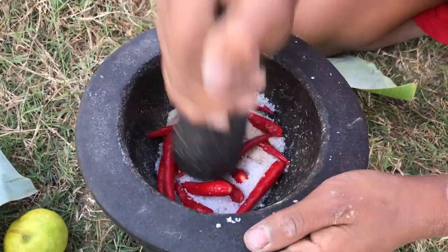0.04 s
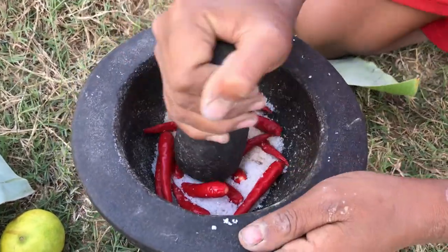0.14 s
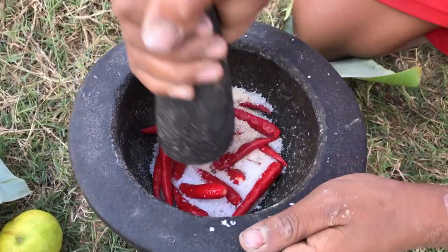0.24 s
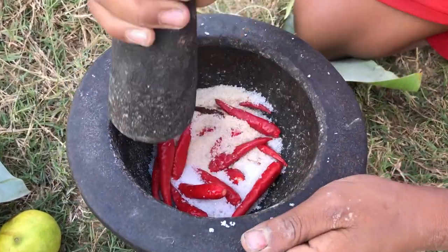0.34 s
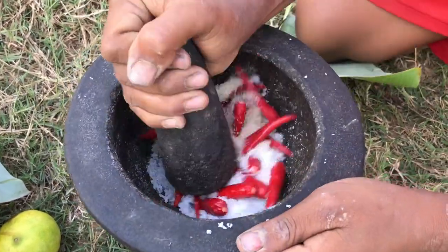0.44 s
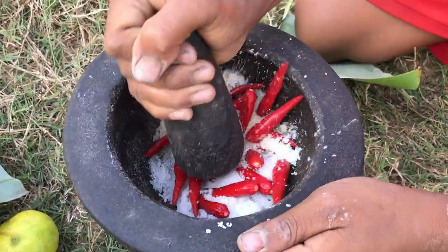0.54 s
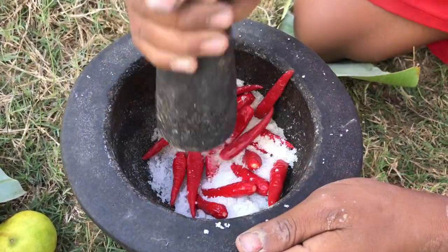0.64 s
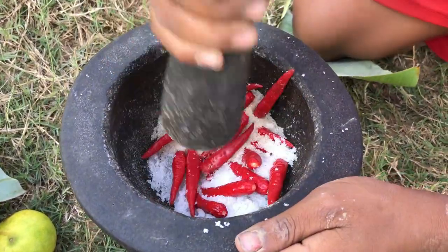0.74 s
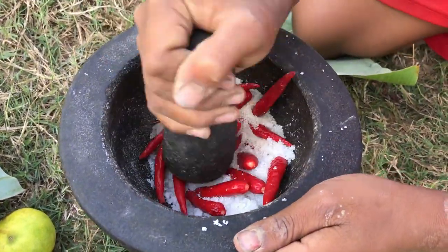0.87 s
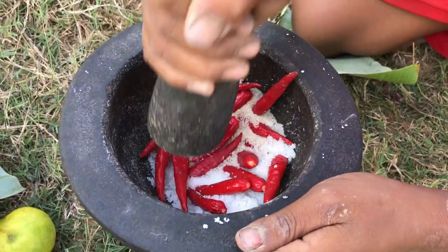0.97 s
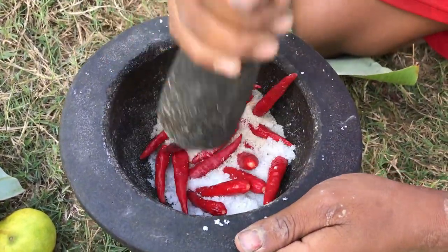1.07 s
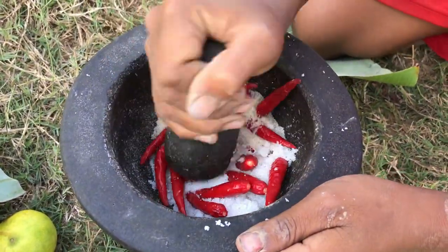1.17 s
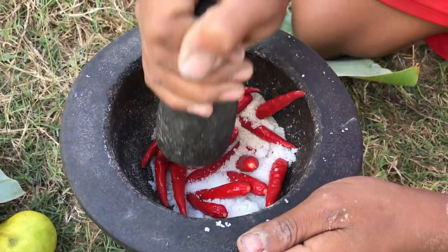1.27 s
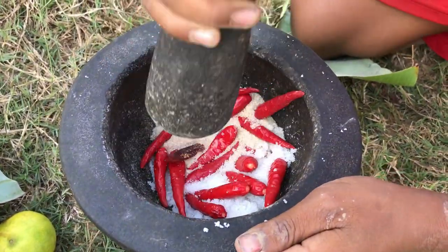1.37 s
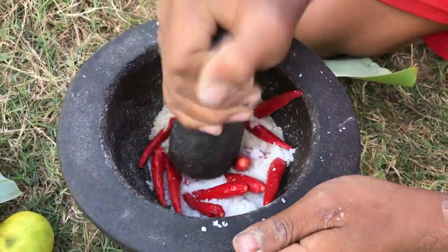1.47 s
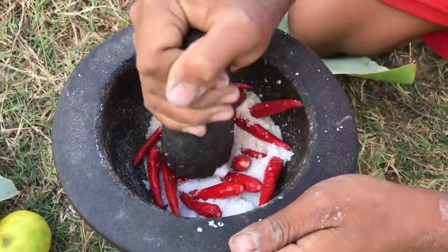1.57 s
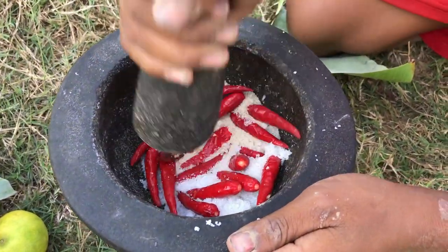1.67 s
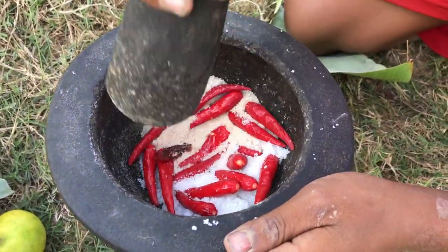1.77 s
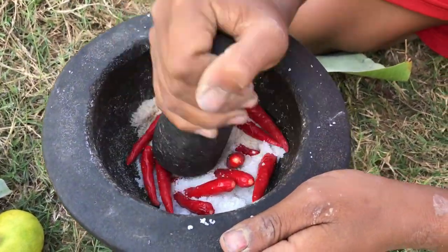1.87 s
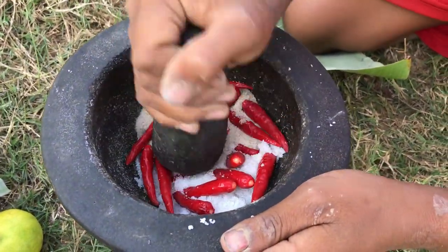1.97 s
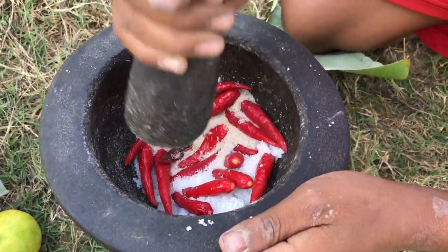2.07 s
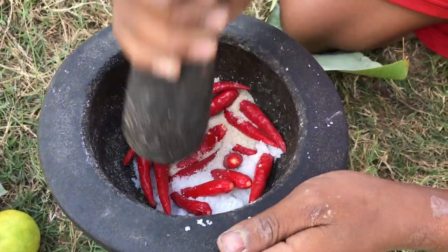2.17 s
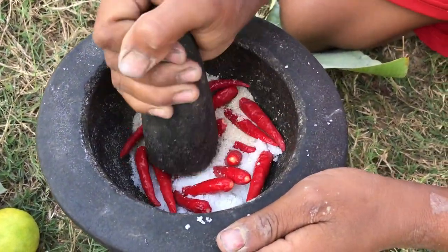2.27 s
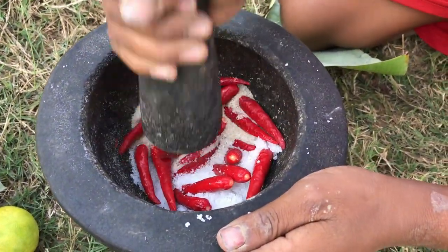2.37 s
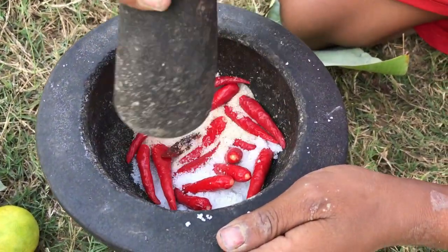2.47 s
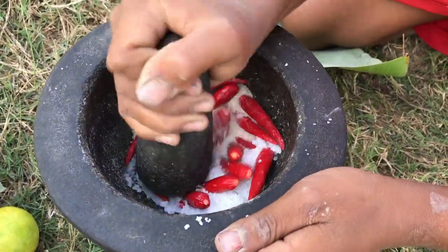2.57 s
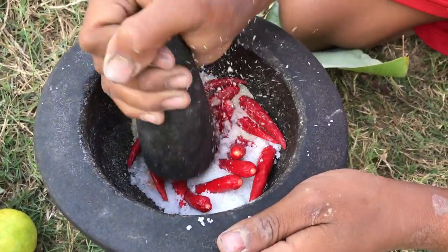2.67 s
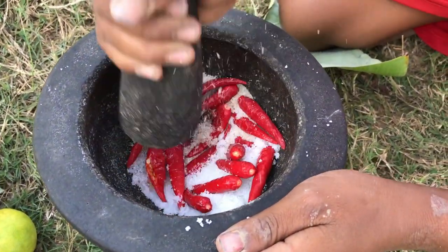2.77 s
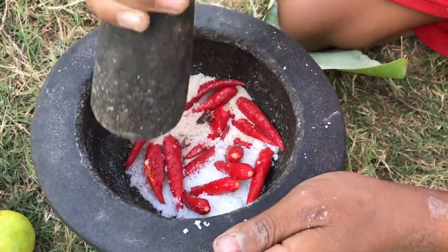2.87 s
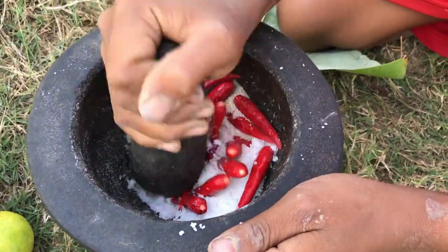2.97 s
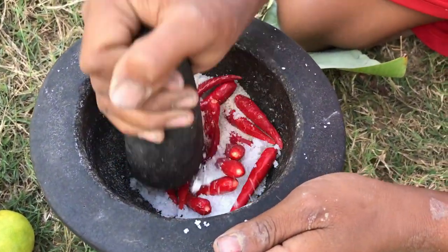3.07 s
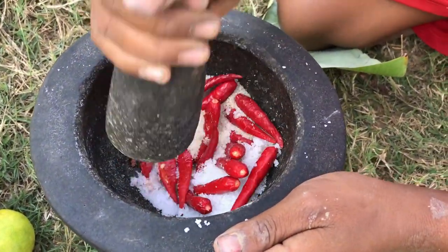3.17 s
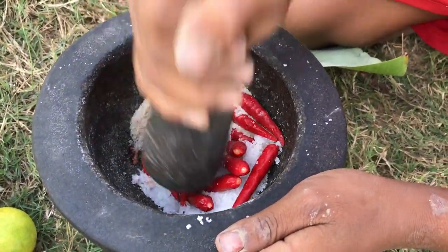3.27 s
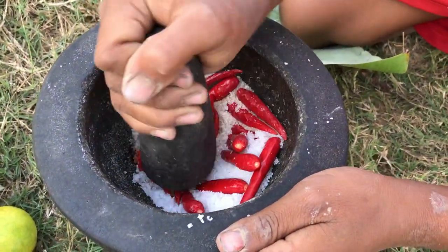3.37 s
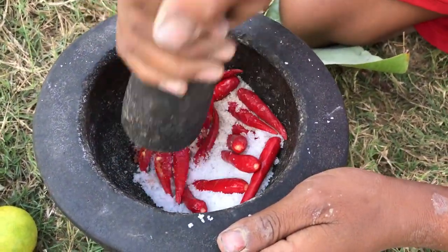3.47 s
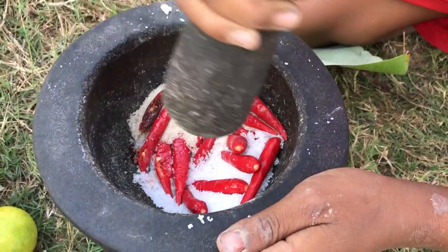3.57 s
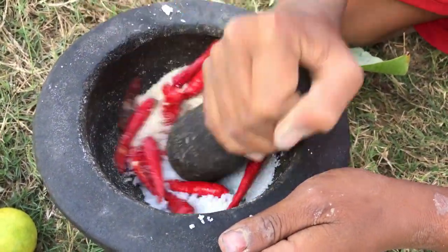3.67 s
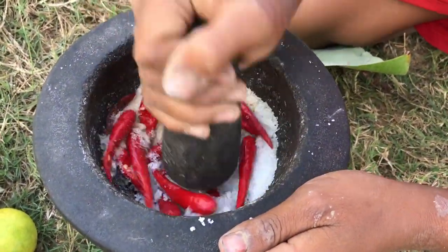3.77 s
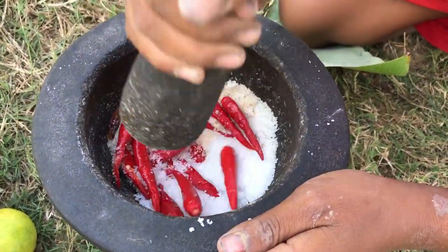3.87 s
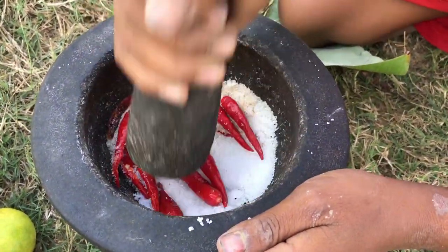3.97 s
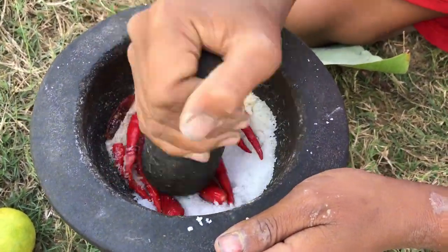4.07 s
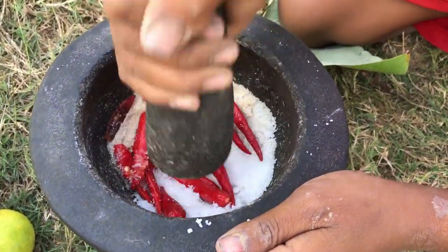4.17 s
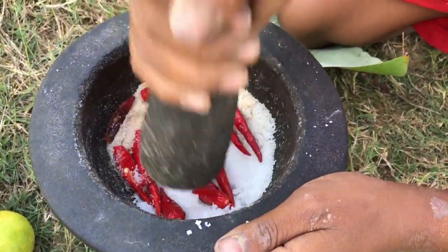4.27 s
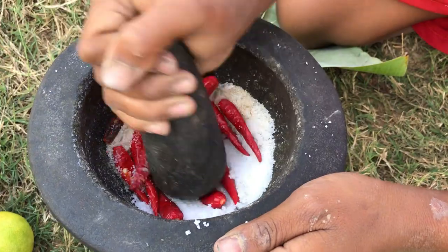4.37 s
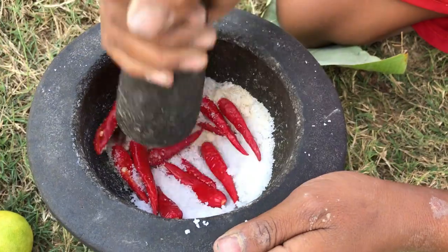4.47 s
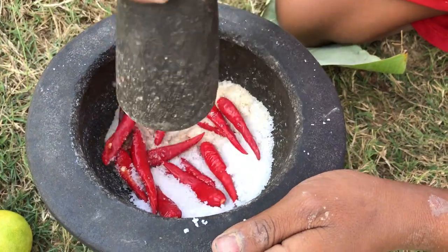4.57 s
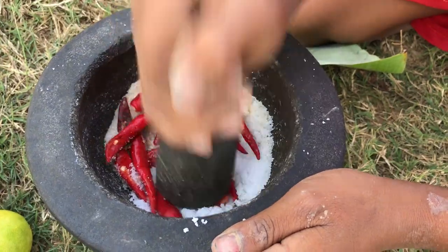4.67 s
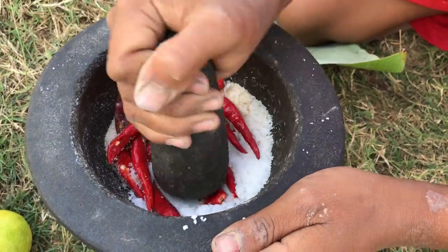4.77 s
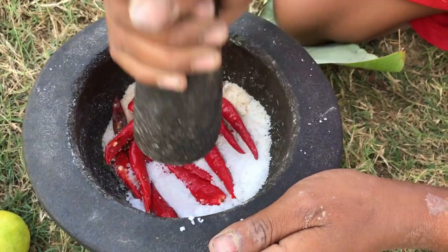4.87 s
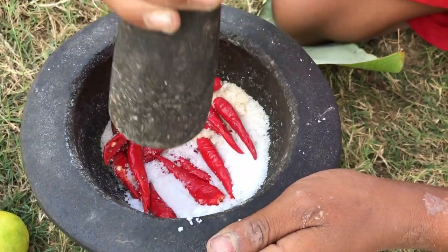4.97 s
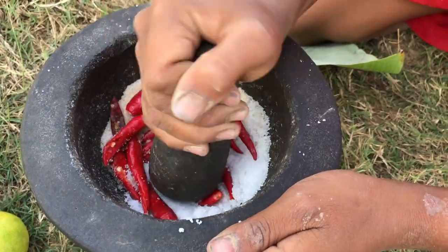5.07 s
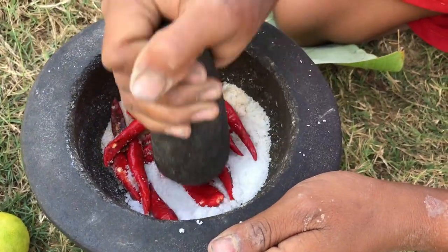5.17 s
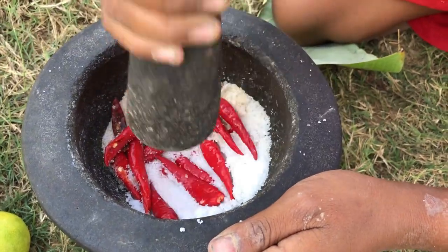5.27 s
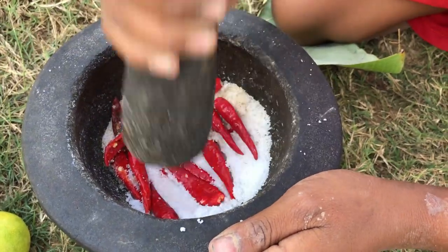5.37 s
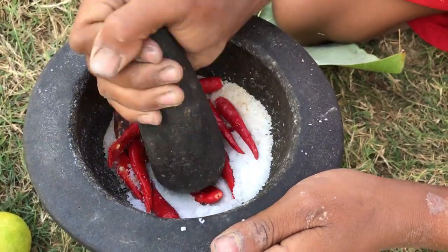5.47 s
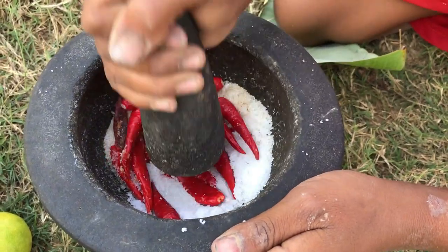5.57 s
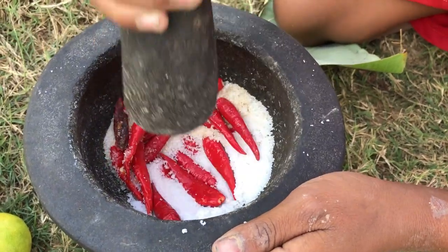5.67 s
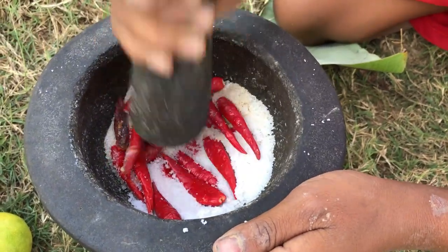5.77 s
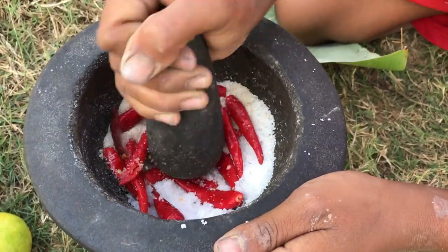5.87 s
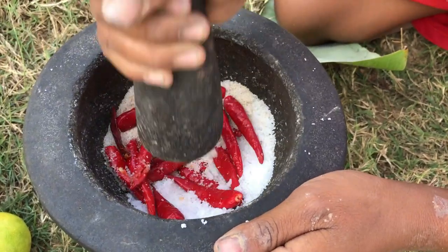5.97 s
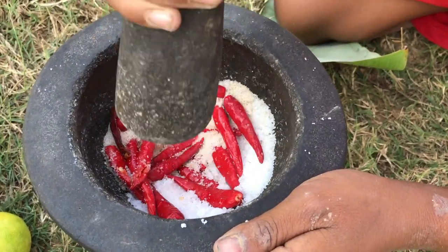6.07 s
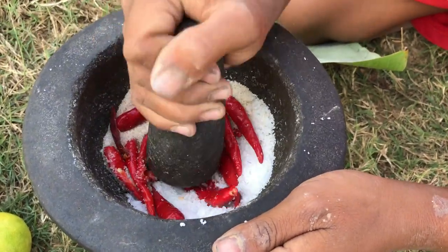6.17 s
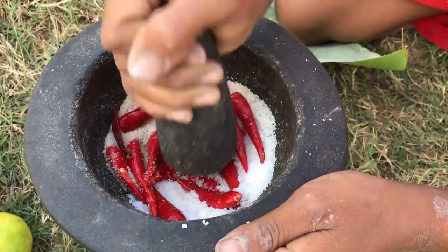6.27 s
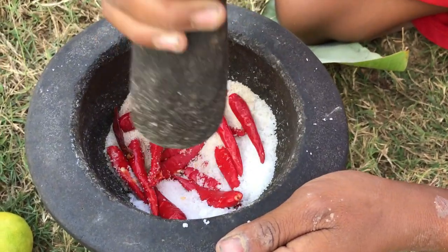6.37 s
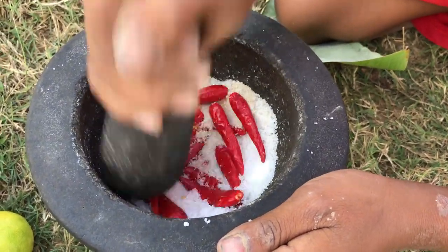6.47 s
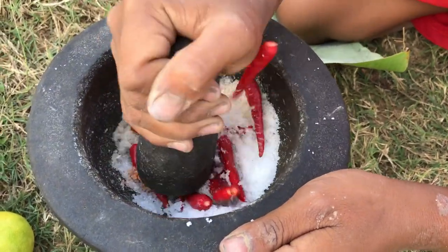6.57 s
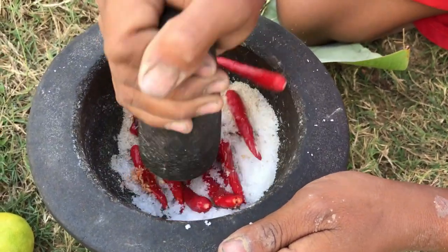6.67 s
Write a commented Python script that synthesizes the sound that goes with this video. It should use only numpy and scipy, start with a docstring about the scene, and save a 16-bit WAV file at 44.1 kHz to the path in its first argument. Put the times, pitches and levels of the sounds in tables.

```python
"""Stone mortar on grass, close microphone

A stone pestle pounds chillies and coarse salt in a stone mortar standing on grass, close to the microphone.
Each blow is a swell of random clicks for the crushed salt, damped tones for the hollow of the bowl, and a
low thud on the soil. Clusters of clicks rasp as the pestle lifts; once it clinks on the bare wall with ringing
tones. Underneath lie filtered noises: rumbling, buffeting wind, breeze, faint swishes and a soft outdoor hiss.
"""
import sys
import numpy as np
from scipy import signal
from scipy.fft import rfft, irfft
from scipy.io import wavfile

SR = 44100
rng = np.random.default_rng(int(sys.argv[2]) if len(sys.argv) > 2 else 0)


def generate_wav(sig):
    """Save sig (samples, or channels by samples) to the path in sys.argv[1] as 16-bit PCM at SR."""
    pcm = np.round(np.clip(np.atleast_2d(sig).T, -1, 1) * 32767).astype(np.int16)
    wavfile.write(sys.argv[1], SR, pcm)


N = 296732
T = np.arange(int(.3 * SR)) / SR  # time axis of every short sound, s

# Blows of the pestle: [t/s when it stops, crushing before that/s, settling after that/s, crunch level/dB,
# fizz level/dB, snap level/dB, hollow pitch f/Hz, contact knock level/dB, stopping knock level/dB,
# thud level/dB]; crunch, fizz and snap levels are before the trims in pounding()
BLOWS = [(0.121, .0061, 0.0021, -17, -15.5, -43, 1030, -23, -17.5, -15.5),
         (0.481, .012, .018, -13.5, -12.5, -47, 795, -28, -27.5, -37),
         (0.858, .0105, 0.014, -16.5, -17.5, -48, 1170, -27.5, -51, -22.5),
         (1.188, 0.0082, 0.0072, -13.5, -15, -21, 1070, -50, -26, -16.5),
         (1.5444, 0.0065, 0.0029, -14.5, -20, -20, 1003, -29, -16, -21),
         (1.918, 0.0056, 0.0013, -17.5, -20.5, -39, 816, -31, -11.5, -19.5),
         (2.276, 0.0075, .0027, -15.5, -17, -27, 810, -44, -18.5, -19.5),
         (2.634, 0.0062, .0055, -21.5, -15, -17, 870, -25.5, -31.5, -29.5),
         (3.0192, 0.005, 0.0067, -22.5, -15.5, -20.5, 800, -36.5, -36.5, -32.5),
         (3.367, 0.013, 0.009, -20, -20.5, -23, 810, -31, -36, -23),
         (3.706, .014, 0.023, -18.5, -19, -22, 950, -32, -42, -28),
         (3.731, .014, 0.019, -15.5, -18, -40, 1090, -24, -54, -34),
         (4.078, 0.009, 0.0088, -15, -17.5, -32, 887, -21.5, -28.5, -18),
         (4.38, .009, 0.0051, -16.5, -12.5, -27, 900, -48.5, -36.5, -18),
         (4.751, .0046, 0.0082, -22.5, -30.5, -15, 940, -28.5, -29.5, -26.5),
         (5.119, .0045, 0.0033, -15, -20.5, -38, 1000, -16, -16, -12.5),
         (5.483, 0.004, 0.0071, -22.5, -27, -16.5, 850, -10.5, -14, -22.5),
         (5.864, 0.019, 0.011, -15, -19, -49, 1090, -42, -48, -24),
         (6.2271, .0082, 0.002, -15.5, -24, -19, 1070, -31, -25, -20),
         (6.5569, 0.0067, 0.01, -18.5, -13.5, -42, 990, -36, -37, -25.5)]


def undb(db):
    """Decibels to gain."""
    return 10 ** (np.asarray(db) / 20)


def burst(x, db):
    """Scale a short sound to the energy of 10 ms at this level."""
    energy = np.sum(x ** 2) / (.01 * SR)
    return x * undb(db) / np.sqrt(energy + 1e-18)


def add(out, s, x):
    """Mix x into out from time s on."""
    i = max(int(s * SR), 0)
    out[i:i + len(x)] += x[:max(N - i, 0)]


def colour(x, points, size=4096):
    """Causal, minimum-phase filter with the gain of (Hz, dB) points."""
    hz, db = np.transpose(points)
    log_bins = np.log(np.fft.rfftfreq(size, 1 / SR) + 1)
    gain = undb(np.interp(log_bins, np.log(hz), db))
    # folding the cepstrum forward in time makes the filter causal
    cepstrum = irfft(np.log(gain))
    cepstrum[1:size // 2] *= 2
    cepstrum[size // 2 + 1:] = 0
    impulse = irfft(np.exp(rfft(cepstrum)))
    return signal.fftconvolve(x, impulse)[:len(x)]


def resonate(x, hz, width):
    """One resonance, gain 1 at its centre."""
    b, a = signal.iirpeak(hz, hz / width, fs=SR)
    return signal.lfilter(b, a, x)


def ring(modes, push):
    """Damped (Hz, dB, t60) modes that build up with a time constant of push seconds."""
    tones = sum(undb(db - 60 * T / t60) * np.sin(2 * np.pi * hz * T) for hz, db, t60 in modes)
    return tones * (1 - np.exp(-T / push))


def swell(rise, decay, start):
    """Pressure that grows from a starting share to its peak, then lets go."""
    growing = start + (1 - start) * np.minimum(T / rise, 1)
    return growing * np.exp(-(np.maximum(T - rise, 0) / decay) ** 1.05)


def outdoors():
    """Wind and hiss as coloured noises with drifting levels; the buffeting is stirred by each stroke."""
    # Background spectra: [f/Hz, level/dB]
    rumble = [(20, -26), (32, -48.5), (48, 4.5), (85, -2.5), (125, -8.5), (200, -20.5), (400, -56.5)]
    buffet = [(90, -10), (160, -1), (300, -2), (550, -9), (900, -26.5), (2000, -57)]
    breeze = [(400, -4.5), (800, 8.5), (1500, 5), (3200, -1), (4500, -4), (7000, -17.5)]
    hiss = [(3000, 1.5), (5000, -2.5), (6800, 0), (8000, -2.5), (10500, -4.5), (12500, -3.5), (16000, -4)]
    # Their levels at the microphone, before trim, flutter and stir: [t/s, level/dB]
    rumble_level = [(0.0, -36), (0.71, -44.5), (1.4, -38.5), (1.54, -42.5), (3.32, -49.5), (3.84, -42),
                    (4.55, -40.5), (4.85, -51.5), (5.26, -42), (5.68, -46), (5.92, -41), (6.73, -46)]
    buffet_level = [(0, -50.5), (.75, -54.5), (1.33, -48.5), (1.85, -57), (2.8, -55), (3.3, -50.5),
                    (3.55, -50), (4.35, -42.5), (4.68, -45.5), (4.85, -55.5), (5.35, -47), (5.6, -54),
                    (6.05, -48.5), (6.73, -50.5)]
    breeze_level = [(0, -53), (.4, -46.5), (.75, -49), (1.2, -52), (1.85, -53), (2.15, -52), (2.9, -58),
                    (3.6, -56.5), (3.95, -46), (4.3, -54), (4.68, -51.5), (4.88, -66), (5.1, -51.5),
                    (5.3, -58.5), (5.8, -55), (6.15, -54), (6.42, -58), (6.65, -45)]
    hiss_level = [(0, -46.5), (.15, -40.5), (.35, -51.5), (.8, -52), (1.05, -46.5), (1.45, -55), (2.5, -57),
                  (3.0, -54.5), (3.28, -59.5), (3.9, -53), (4.3, -58), (4.649, -49), (4.9, -65),
                  (5.251, -63.5), (5.78, -58.5), (6.17, -50), (6.42, -58.5), (6.68, -51)]
    # columns: spectrum, level, trim/dB, flutter/dB, growth from one blow to the next as the arm comes down/dB
    layers = ((rumble, rumble_level, 2.5, 2.1, 0),
              (buffet, buffet_level, 1.1, 2.1, 3),
              (breeze, breeze_level, 0.4, 1.5, 0),
              (hiss, hiss_level, 0.4, 1.2, 0))
    t, out = np.arange(N) / SR, np.zeros(N)
    knots = np.linspace(0, N / SR, num=120)
    # rises from -0.5 to 0.5 between one blow and the next
    stroke = np.interp(t, [blow[0] for blow in BLOWS], np.arange(len(BLOWS))) % 1 - .5
    for spectrum, level, trim_db, flutter_db, stir_db in layers:
        noise = colour(rng.standard_normal(N), spectrum)
        flutter = flutter_db * np.interp(t, knots, rng.standard_normal(len(knots)))
        level_db = np.interp(t, *np.transpose(level)) + trim_db + flutter + stir_db * stroke
        out += noise / noise.std() * undb(level_db)
    return out


def swishes():
    """Faint airy swishes between blows: soft bands of air noise that swell and fade."""
    # Swishes: [t/s at the loudest, half length to 1/e/s, f/Hz, width of each of two resonances/Hz, level/dB]
    swish_table = [(0.326, 0.055, 2870, 1500, -36), (2.023, .05, 2920, 500, -41),
                   (2.136, .08, 4300, 1100, -45), (2.147, 0.11, 810, 199, -41),
                   (2.438, 0.054, 3760, 700, -43), (5.061, 0.043, 3380, 3000, -42),
                   (5.392, 0.091, 370, 293, -37)]
    out = np.zeros(N)
    for s, length, hz, width, db in swish_table:
        air = rng.standard_normal(len(T)) * np.exp(-((T - T.mean()) / length) ** 2)
        band = resonate(resonate(air, hz, width), hz, width)
        add(out, s - T.mean(), burst(band, db))
    return out


def fractures(rate, spread_db):
    """Random clicks at a mean rate per second, mostly small with a few large ones."""
    happens = rng.random(len(T)) < rate / SR
    size = undb(spread_db * np.minimum(rng.exponential(size=len(T)), 4))
    return happens * size * rng.choice([-1, 1], len(T))


def wall_echo(x):
    """One short reflection across the bowl, which combs the sound a little differently each time."""
    # the lag depends on where the pestle sits: half to all of the longest
    longest_lag_s, echo_db = .0009, -10
    lag = max(int(longest_lag_s * rng.uniform(.5, 1) * SR), 1)
    return x + undb(echo_db) * np.pad(x, (lag, 0))[:len(x)]


def salt(clicks, crunch_db, fizz_db, tilt_db):
    """Clicks in the salt bed, tilted by dB an octave: coarse crystals crunch, fine ones fizz above 5 kHz."""
    # Spectrum of breaking salt before the tilt: [f/Hz, level/dB]
    salt_spectrum = [(200, -42), (560, -17.5), (820, 1), (1100, -1), (1350, -5), (1650, 3), (2900, -2.5),
                     (3950, -3.5), (4600, -4), (8500, -7), (10400, -8), (12500, -9.5), (14500, -5),
                     (16000, -6)]
    # Resonances of pestle and bowl that every crystal excites: [f/Hz, width/Hz, level/dB]
    bowl = [(878, 72, -2), (1060, 200, -9), (2040, 130, -12), (2884, 560, 0), (3600, 17, -11.5),
            (5980, 120, -13), (11670, 76, -2.5), (12340, 410, -1.5)]
    # the more of the salt is fine, the higher its spectrum leans
    lean_db = tilt_db + 0.14 * np.clip(fizz_db - crunch_db, -10, 10)
    leaning = [(hz, db + lean_db * np.log2(hz)) for hz, db in salt_spectrum]
    sound = colour(wall_echo(clicks), leaning)
    sound = sound + sum(undb(db) * resonate(sound, hz, width) for hz, width, db in bowl)
    coarse = signal.sosfilt(signal.butter(4, 5000, "low", fs=SR, output="sos"), sound)
    fine = signal.sosfilt(signal.butter(4, 5000, "high", fs=SR, output="sos"), sound)
    return burst(coarse, crunch_db) + burst(fine, fizz_db)


def rasp(rise, decay):
    """The pestle catches and slips, so the grains come in clusters."""
    knots = T[::200]
    slips = undb(3.5 * np.interp(T, knots, rng.standard_normal(len(knots))))
    return fractures(rate=3500, spread_db=3.0) * slips * swell(rise, decay, start=0.16)


def loose_salt():
    """Crumbs patter back after each blow, salt rasps as the pestle lifts, and single crystals tick."""
    # Salt drags and slides, mostly as the pestle lifts: [t/s at the loudest, rise/s, crunch level/dB,
    # fizz level/dB]
    rasps = [(.108, .04, -36, -32), (.215, 0.025, -34, -48), (.59, 0.064, -25.5, -30.5),
             (1.27, .012, -36, -34), (2.374, 0.035, -35, -41.5), (2.731, 0.043, -31.5, -34.5),
             (3.116, 0.032, -45.5, -64), (3.456, 0.058, -31.5, -38), (3.8, 0.028, -26.5, -32.5),
             (4.155, 0.043, -32.5, -40), (4.491, 0.06, -25, -30.5), (4.6, .04, -37.5, -39.5),
             (4.836, 0.016, -41, -51), (5.21, 0.018, -36, -45), (5.573, 0.025, -32.5, -44),
             (6.291, .048, -48.5, -45), (6.68, 0.086, -34.5, -38)]
    # Single crystals that crack or land: [t/s, crunch level/dB, fizz level/dB]
    ticks = [(2.8324, -40, -35), (3.4092, -38, -35.5), (3.8241, -31.5, -42), (3.9046, -35, -26.5),
             (5.126, -39, -25), (5.133, -31, -29), (5.4095, -51.5, -52), (5.5144, -38.5, -48),
             (5.5317, -44, -50)]
    scatter_db = -28  # crumbs relative to their blow
    strays_per_s, stray_fizz_db = 1.2, -48  # fainter crystals that drop at random
    out = np.zeros(N)
    for s, _, _, crunch_db, fizz_db, *_ in BLOWS:
        crumbs = rasp(rise=0.021, decay=0.053)
        add(out, s, salt(crumbs, crunch_db + scatter_db, fizz_db + scatter_db, tilt_db=-2.0))
    for s, rise, crunch_db, fizz_db in rasps:
        add(out, s - rise, salt(rasp(rise, decay=0.019), crunch_db, fizz_db, tilt_db=-2.8))
    stray_times = rng.uniform(0, N / SR, int(strays_per_s * N / SR))
    strays = [(s, stray_fizz_db - 23, stray_fizz_db) for s in stray_times]
    for s, crunch_db, fizz_db in list(ticks) + strays:
        crack = rng.standard_normal(len(T)) * np.exp(-T / 0.0016)
        add(out, s - .0004, salt(crack, crunch_db, fizz_db, tilt_db=0.3))
    return out


def clack(push):
    """The short, hard note of the pestle itself."""
    return ring([(1850, 0, 0.013)], push)


def wall_contacts():
    """With no salt between them, stone rings on stone; cushioned touches only bump and scuff."""
    # Pestle bouncing on the bare wall: [t/s, knock f/Hz, knock level/dB, clack level/dB, stone ring level/dB]
    clinks = [(.3883, 860, -14, -14, -17), (.4173, 1004, -15.5, -26.5, -42), (.4238, 920, -25, -36, -29),
              (.4305, 890, -30, -38, -23)]
    # Ring of the stone: [f/Hz, level/dB, t60/s]
    stone = [(3520, 14, 0.086), (7130, 1.5, 0.051), (8600, -3, 0.036), (9440, 6, 0.012)]
    # Dull bumps of hand and pestle against the bowl: [t/s, f/Hz, level/dB]
    bumps = [(1.4403, 415, -28.5), (1.503, 900, -40), (1.53, 714, -35.5), (1.531, 1610, -35),
             (3.324, 213, -35)]
    out = np.zeros(N)
    for s, hz, knock_db, clack_db, ring_db in clinks:
        knock = ring([(hz, 0, .008), (1.3 * hz, -3, .006)], push=0.0011)
        add(out, s - .0004, burst(knock, knock_db))
        add(out, s - .0004, burst(clack(push=0.00067), clack_db))
        add(out, s, burst(ring(stone, push=0.00044), ring_db))
    for s, hz, db in bumps:
        # dead in about two cycles, with a short dull scuff
        add(out, s, burst(ring([(hz, 0, 1.55 / hz)], push=0.0014), db))
        scuff = rng.standard_normal(len(T)) * np.exp(-T / 0.018)
        dull_scuff = resonate(resonate(scuff, hz, hz), hz, hz)
        add(out, s, burst(dull_scuff, db - 5.0))
    return out


def hollow(hz, push):
    """Knock of the air between pestle and bowl; its pitch depends on where the pestle sits."""
    # Modes of the hollow: [multiple of its pitch, level/dB, t60/s]
    hollow_modes = [(0.682, 0.5, 0.011), (1.002, 15, 0.0095), (1.28, -2.5, 0.015)]
    return ring([(hz * multiple, db, t60) for multiple, db, t60 in hollow_modes], push)


def pounding():
    """The pestle meets the salt, crushes it and stops; the mortar then bounces on the soil."""
    # The mortar rocking on the soil: [f/Hz, level/dB, t60/s]
    rocking = [(218.7, -1, 0.043), (258, 6.5, 0.016), (555, 4, 0.01)]
    # stopping knock of an ordinary blow; above it the pestle nears the stone, below it the salt cushions
    firm_db = -22.5
    # the salt bed gives way once more just after the stop: peak delay s, half length s, dB re the blow
    collapse_after_s, collapse_s, collapse_level_db = .009, 0.0036, -22.5
    out = np.zeros(N)
    for s, crush, settle, crunch_db, fizz_db, snap_db, hz, contact_db, stop_db, thud_db in BLOWS:
        firmness_db = stop_db - firm_db
        # a quick blow bites at once, a slow one eases into the salt
        bite = 0.56 * np.exp(-crush / 0.013)
        grains = fractures(rate=17000, spread_db=5.0) * swell(crush, settle, start=bite)
        add(out, s - crush, salt(grains, crunch_db - .6, fizz_db - .6, tilt_db=-1.8))

        # the last crystals give way all at once
        snap = rng.standard_normal(len(T)) * np.exp(-T / 0.00036)
        fine_db = 0.62 * (fizz_db - crunch_db)
        add(out, s - .0005, salt(snap, snap_db - 5.5 - fine_db, snap_db - 0.5 + fine_db, tilt_db=-0.1))

        # the hollow knocks on contact and again on stopping, the pestle clacks in between
        add(out, s - crush, burst(hollow(hz, push=0.0015), contact_db))
        add(out, s - .0006, burst(hollow(hz, push=0.001), stop_db))
        add(out, s - crush / 2, burst(clack(push=0.0044), crunch_db - 10))

        # the heavy bowl sinks into the ground
        thud = ring([(89.6, 0, 0.042)], push=0.016)
        add(out, s + 0.0024, -burst(thud, thud_db))
        # it rocks with the thud, and more so when the pestle reaches the stone
        rock_db = thud_db - 3.5 + 0.46 * firmness_db
        add(out, s + 0.0011, -burst(ring(rocking, push=0.0011), rock_db))

        # the deeper the cushion of salt, the more of it collapses
        grains = fractures(rate=12000, spread_db=10.0) * np.exp(-(T / collapse_s - 2) ** 2)
        collapse_db = collapse_level_db - 0.37 * firmness_db
        collapse = salt(grains, crunch_db + collapse_db, fizz_db + collapse_db, tilt_db=-1.5)
        add(out, s + collapse_after_s - 2 * collapse_s, collapse)
    return out


def scene():
    """Everything at one close microphone."""
    return (outdoors() + swishes() + loose_salt() + wall_contacts() + pounding())[None]


def record(dry):
    """The recorder drops the deepest bass, clips whatever exceeds full scale and cuts the top."""
    thinned = signal.sosfilt(signal.butter(3, 30, "high", fs=SR, output="sos"), dry)
    clipped = np.clip(thinned, -1, 1)
    top_cut = signal.ellip(10, .2, 70, 15900, fs=SR, output="sos")
    return signal.sosfilt(top_cut, clipped)


dry = scene()
out = record(dry)
generate_wav(out)
```